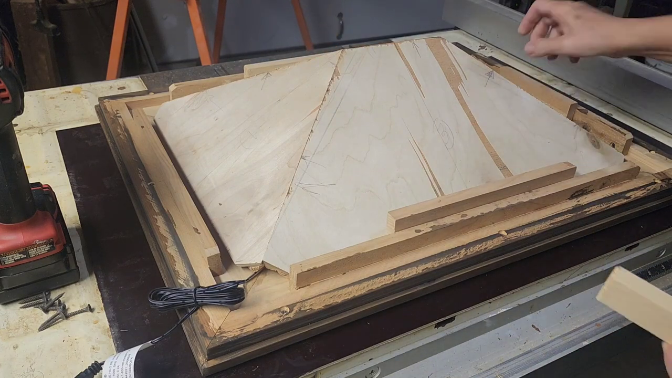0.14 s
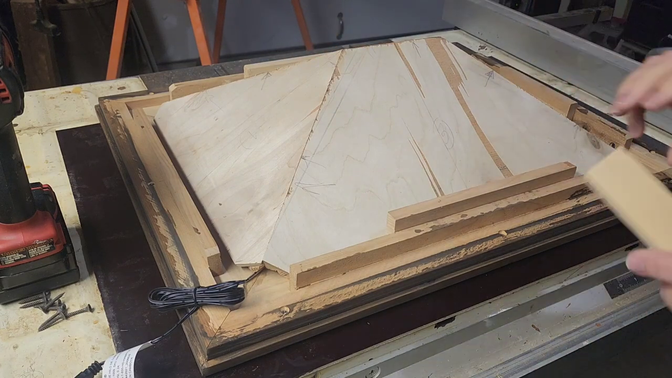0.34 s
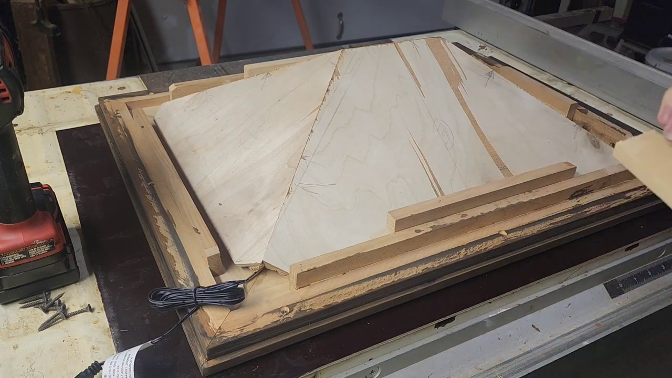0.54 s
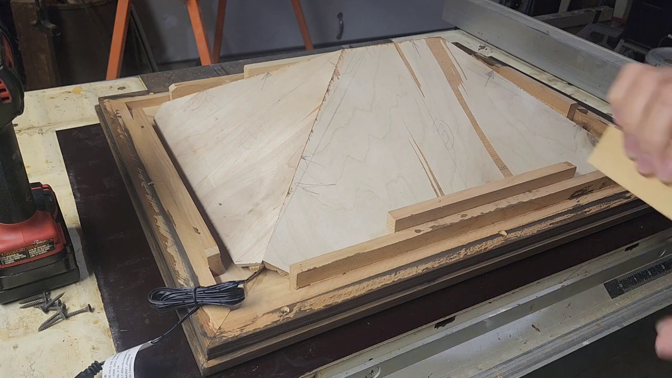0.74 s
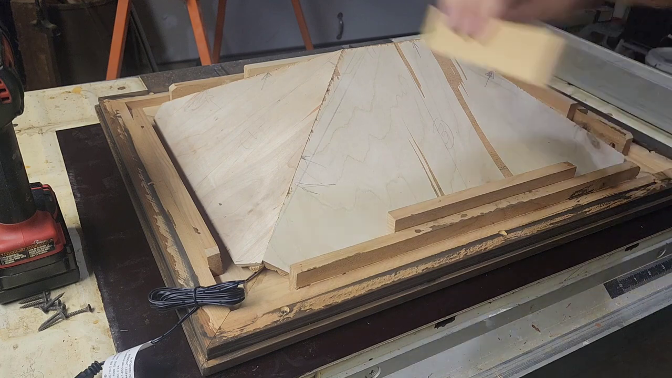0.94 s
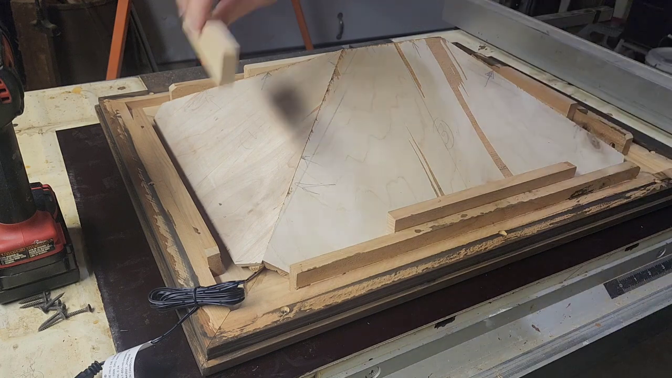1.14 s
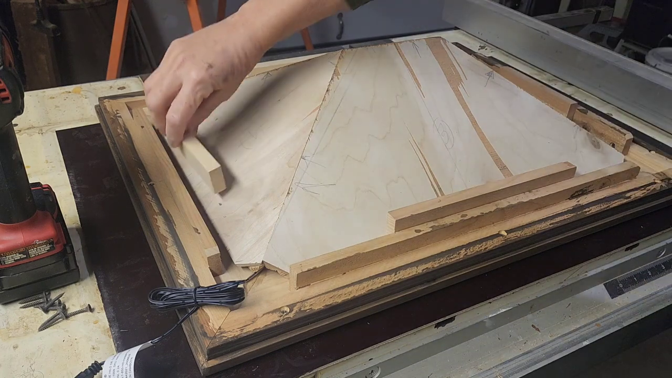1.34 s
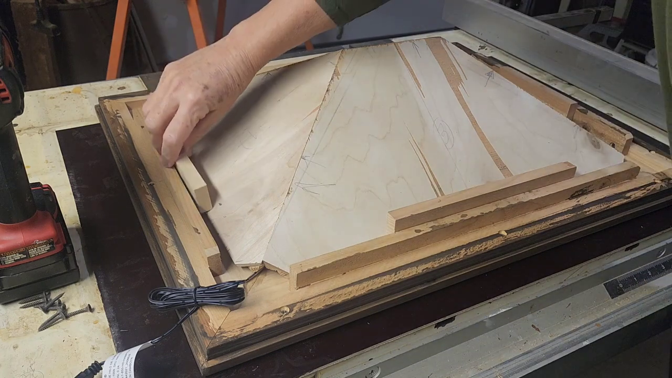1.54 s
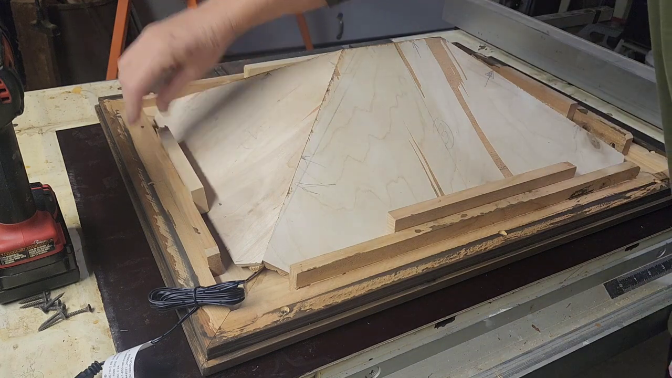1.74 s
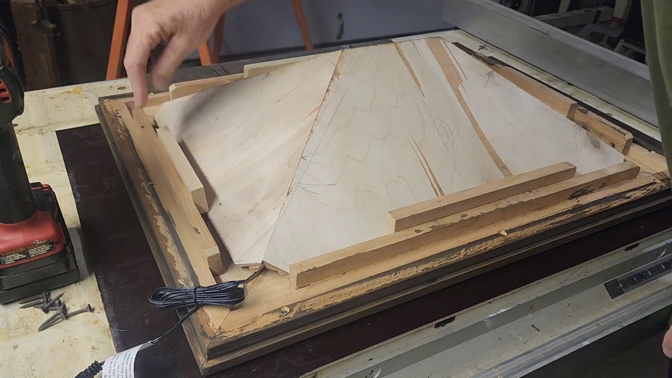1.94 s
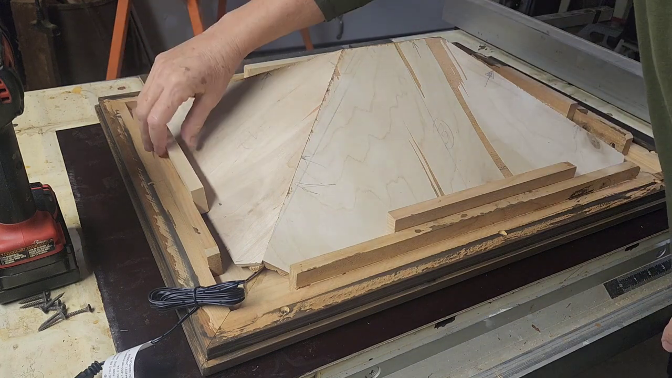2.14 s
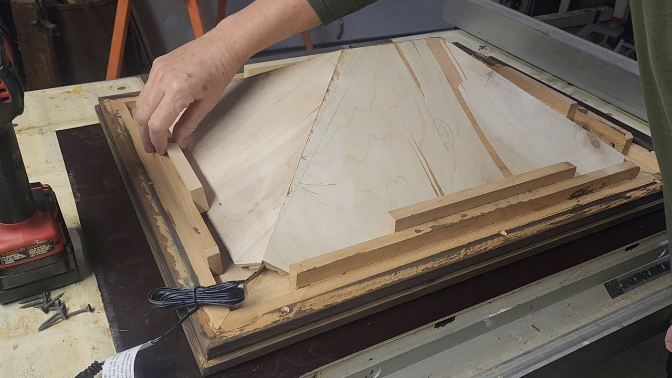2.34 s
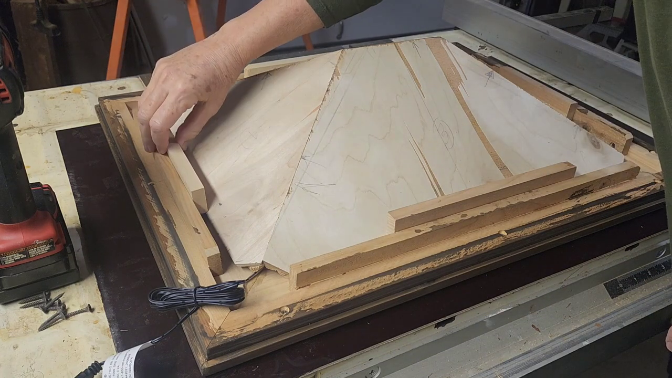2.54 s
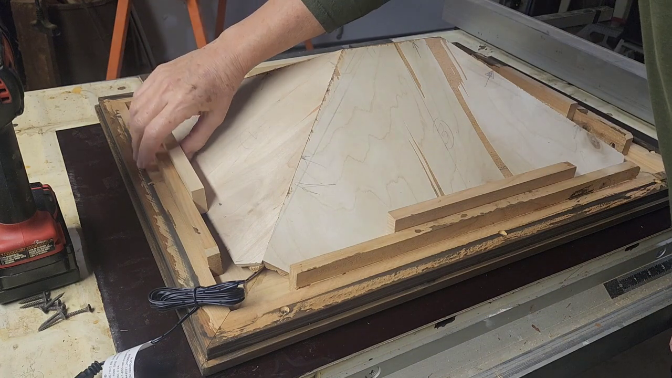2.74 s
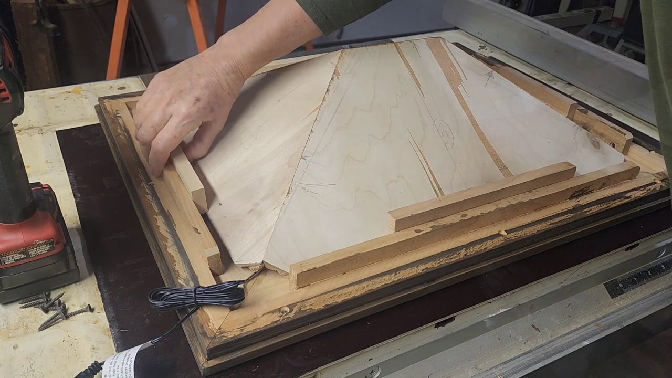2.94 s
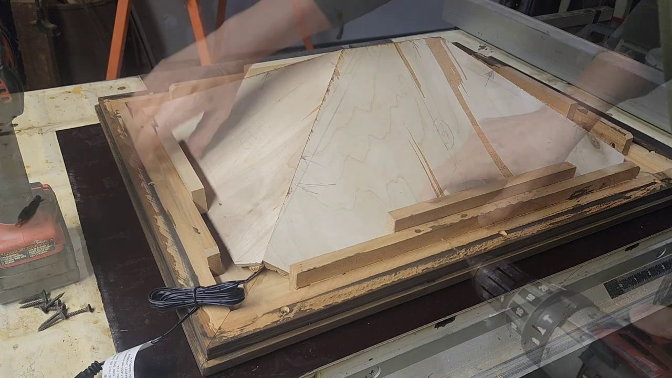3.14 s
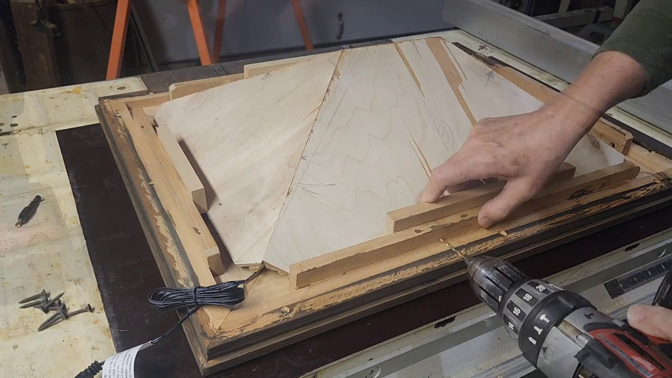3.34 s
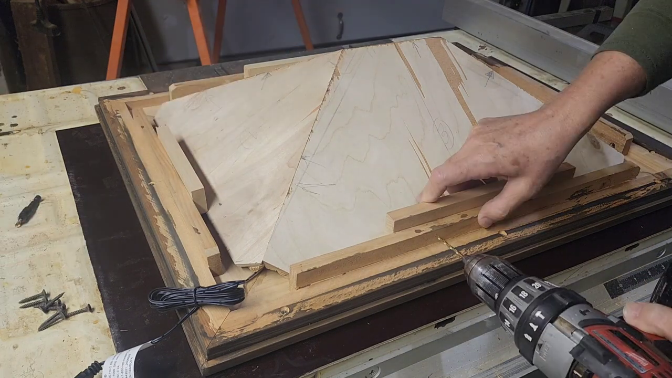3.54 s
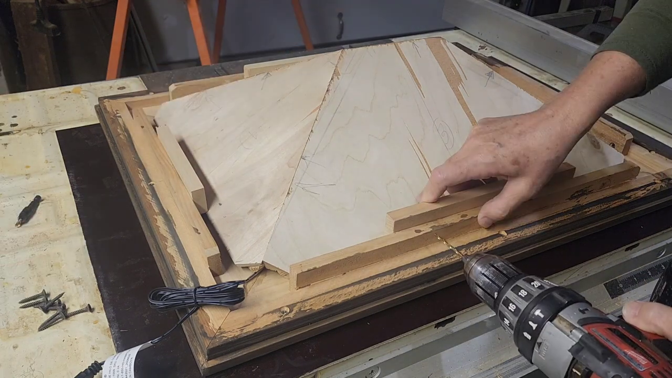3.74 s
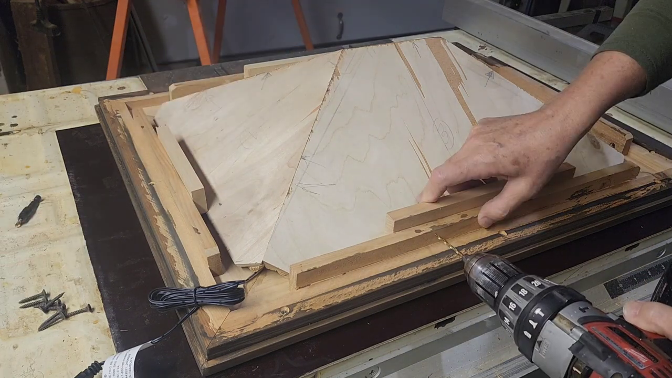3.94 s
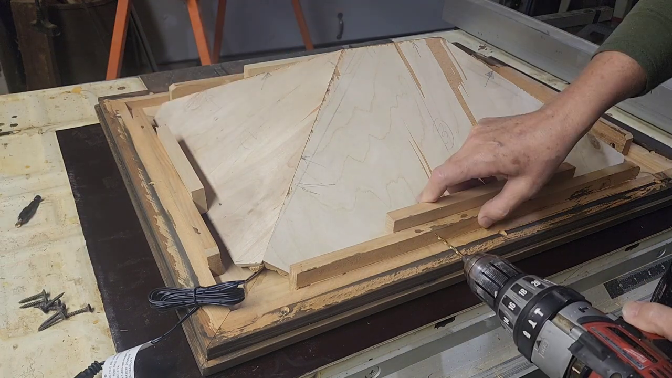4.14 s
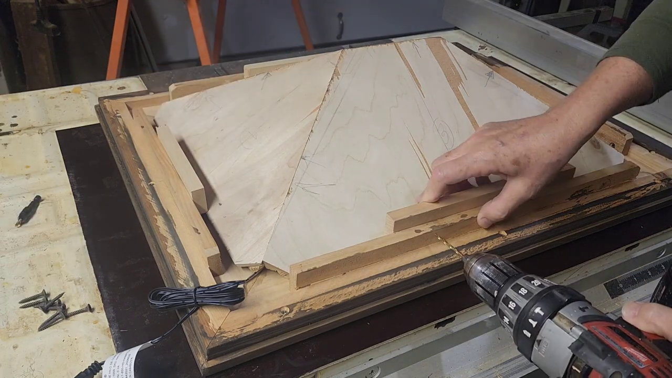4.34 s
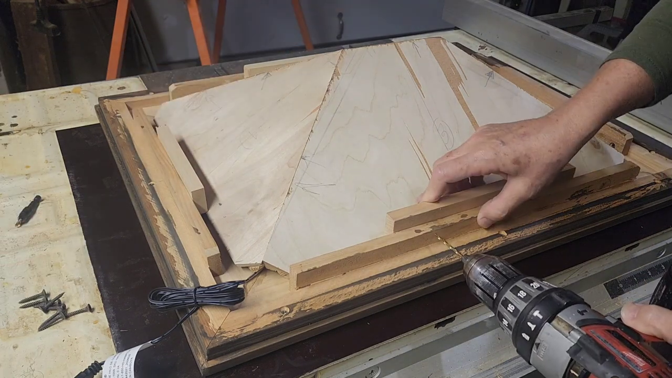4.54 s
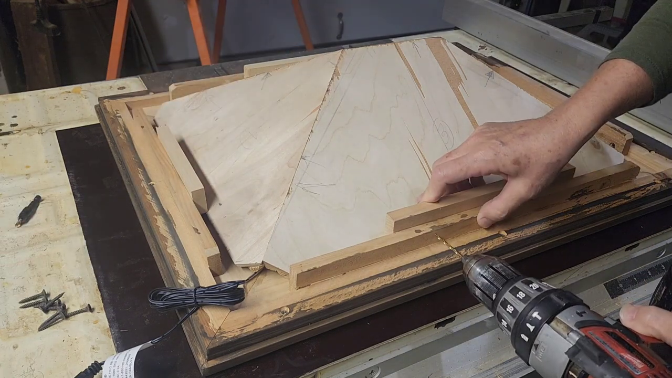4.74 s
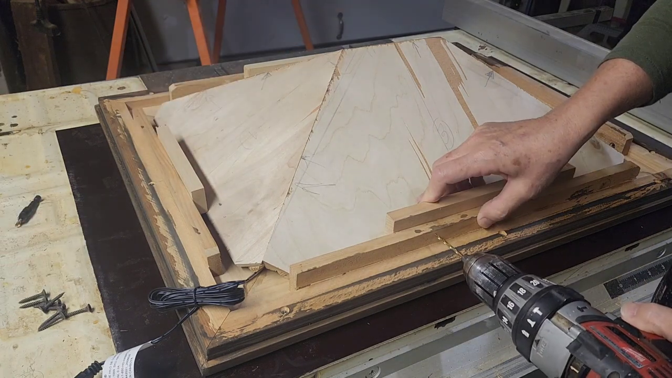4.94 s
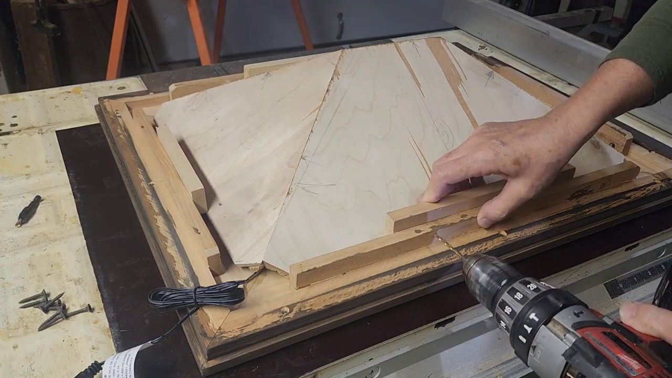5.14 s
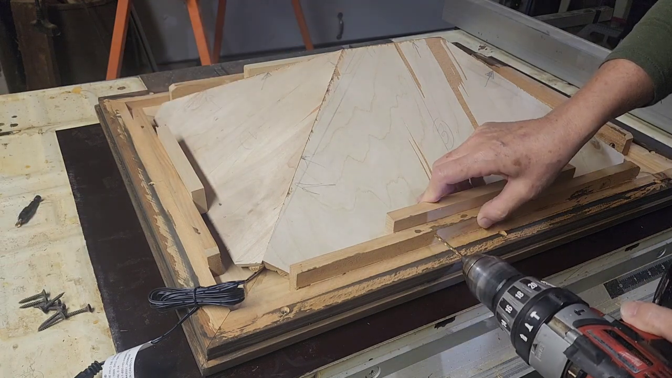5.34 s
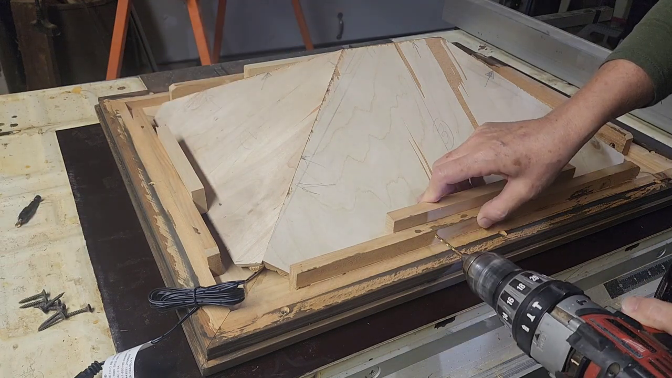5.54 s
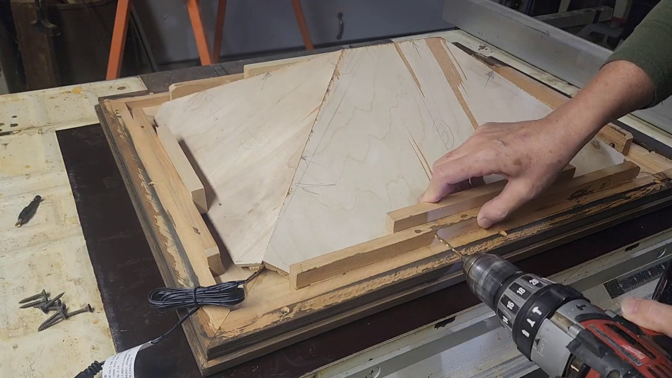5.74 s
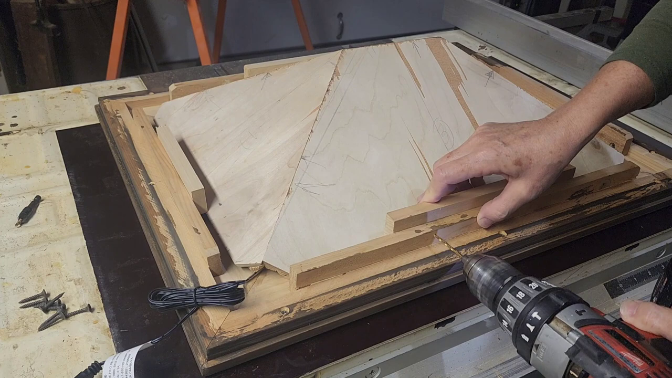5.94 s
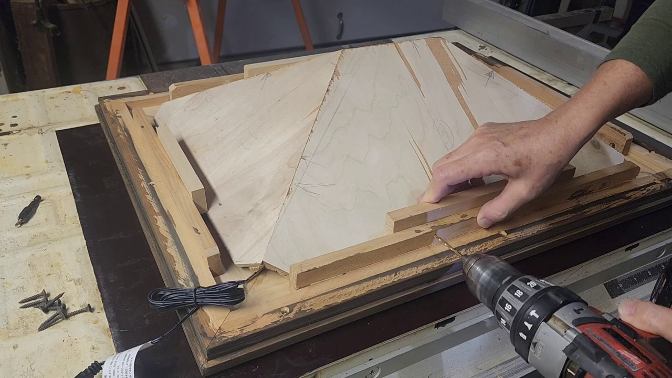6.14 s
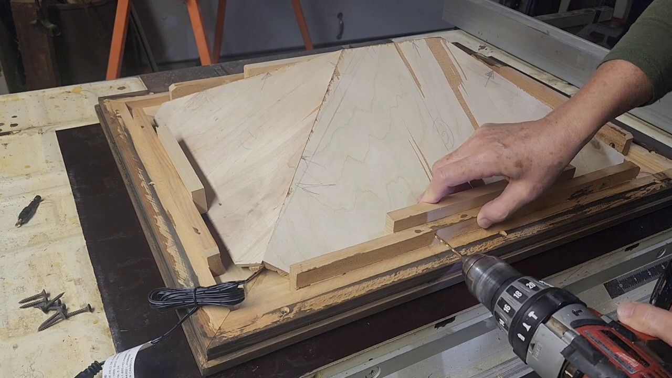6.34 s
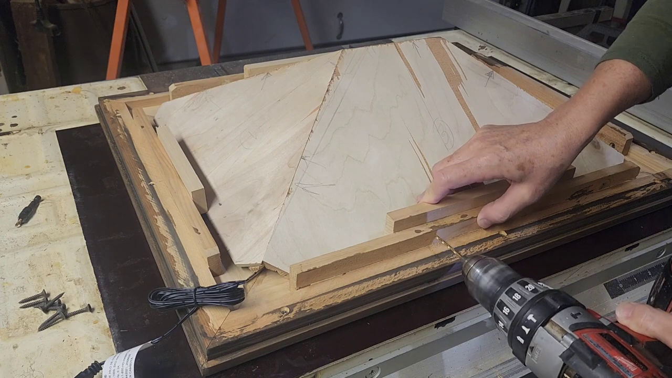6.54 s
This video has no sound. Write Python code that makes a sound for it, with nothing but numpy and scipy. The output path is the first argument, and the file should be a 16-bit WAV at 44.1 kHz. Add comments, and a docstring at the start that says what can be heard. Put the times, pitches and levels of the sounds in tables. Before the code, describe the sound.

Quiet workshop with faint traffic rumble and hum; a wooden batten knocks onto a panel, small metal parts jingle, then a cordless drill whirs up and labours.

```python
"""Cordless drill in a quiet workshop

Traffic rumble, tyre wash and drones rise and fall outside (coloured noise, sines) under a hum and hiss.
A batten knocks on a panel (pushed modes), small metal parts jingle (noise-fed resonators), a grip rubs.
A bit ticks into a screw (filtered cracks); the trigger clicks and the drill spins up, labours, recovers:
slot and gear tones follow the modelled motor speed over tooth rattle, a steady whine and bench shake."""
import sys
import numpy as np
from scipy import signal
from scipy.fft import rfft, irfft
from scipy.io import wavfile
from scipy.ndimage import uniform_filter1d

SR = 44100
rng = np.random.default_rng(int(sys.argv[2]) if len(sys.argv) > 2 else 0)


def to_wav(s):
    """Save 16-bit WAV."""
    ch = np.atleast_2d(s).T  # columns
    pcm = np.round(np.clip(ch, -1, 1) * 32767)  # PCM
    wavfile.write(sys.argv[1], SR, pcm.astype(np.int16))


N = 291060  # samples, 6.6 s
T = np.arange(N) / SR
ROOM_T60_S = 0.28


def undb(db):
    """Level law: amplitude gain from dB."""
    return 10 ** (np.asarray(db) / 20)


def unit(x):
    """Normalisation: scale to an rms of 1."""
    return x / np.sqrt(np.mean(x ** 2))


def noise(channels=1):
    """White noise: equal power at all frequencies, independent in each channel."""
    return rng.standard_normal((channels, N))


def db_at(spectrum, hz):
    """Spectral envelope: dB interpolated along log frequency between (Hz, dB) points."""
    points, db = np.transpose(spectrum)
    return np.interp(np.log(hz), np.log(points), db)


def shape(x, db_of):
    """Zero-phase filtering: weight each Fourier component by a gain in dB."""
    hz = np.arange(1, N // 2 + 2) * SR / N
    return irfft(rfft(x) * undb(db_of(hz)), N)


def colour(x, spectrum):
    """Spectral shaping: filter by (Hz, dB) points, then set the rms to 1."""
    return unit(shape(x, lambda hz: db_at(spectrum, hz)))


def walk(rate, channels=1):
    """Slow random modulation: levels held 1 / rate s and smoothed twice; spread near 1."""
    k = int(SR / rate)
    held = np.repeat(rng.standard_normal((channels, N // k + 1)), k, axis=1)
    smooth = uniform_filter1d(uniform_filter1d(held, k), k)
    return 1.3 * smooth[:, :N]


def curve(rows, silent_db=-130.):
    """Level automation: gain along (s, dB) rows, at silent_db outside them."""
    s, db = np.transpose(rows)
    return undb(np.interp(T, s, db, silent_db, silent_db))


def burst(s, db, held_s, rise_db_per_s, fall_db_per_s):
    """Exponential envelope: attack, hold and release as straight lines in dB."""
    before_s, after_s = np.maximum(s - T, 0), np.maximum(T - s - held_s, 0)
    return undb(db - rise_db_per_s * before_s - fall_db_per_s * after_s)


def pair(x, alike):
    """Interchannel correlation: left and right as sum and difference of a mid and a side signal."""
    alike = np.clip(alike, 0, 1)
    mid = np.sqrt((1 + alike) / 2) * x[0]
    side = np.sqrt((1 - alike) / 2) * x[1]
    return mid + side * np.array([[1], [-1]])


def room(x, wet_db):
    """Diffuse reverberation: convolution with decaying noise, unrelated left and right."""
    t = T[:SR // 2]
    decay = np.exp(-np.log(1000) * t / ROOM_T60_S) * (t > .003)
    tail = rng.standard_normal((2, len(t))) * decay
    tail = tail / np.sqrt(np.sum(tail ** 2, axis=1, keepdims=True))
    return undb(wet_db) * signal.fftconvolve(x[None], tail, axes=1)[:, :N]


def strike(modes, push_ms):
    """Modal impact: a smooth push (Hann pulse) drives decaying modes of alternate sign; peak 1."""
    t = T[:SR // 4]
    ring = np.zeros(len(t))
    for k, (hz, db, t60) in enumerate(modes):
        ring += (-1) ** k * undb(db) * np.sin(2 * np.pi * hz * t) * np.exp(-np.log(1000) * t / t60)
    push = np.hanning(max(int(push_ms * SR / 1000), 1) + 2)
    blow = np.convolve(ring, push)[:len(t)]
    return blow / np.abs(blow).max()


def add(out, x, s):
    """Superposition: mix x into out from s seconds on."""
    i = int(s * SR)
    out[..., i:i + x.shape[-1]] += x[..., :N - i]


# Hiss spectrum. Each row: frequency in Hz, relative density in dB per Hz.
HISS_SPECTRUM = [(1060, -32), (1800, -3), (3050, 0), (3720, -4), (5160, -4.5), (6410, -8), (7400, 3),
                 (8300, -7), (8750, -20), (9500, -9.5), (14000, -11), (15800, -8)]


def hiss():
    """Stationary noise: microphone hiss, unrelated left and right."""
    return undb(-83.0) * colour(noise(channels=2), HISS_SPECTRUM)


# Traffic levels. Each row: time in seconds, deep rumble in dB, rumble in dB, tyre wash in dB.
TRAFFIC_LEVELS = [(0, -57.5, -57.5, -65.5), (.6, -51.5, -55, -68.5), (1.6, -56.5, -54.5, -60.5),
                  (2.1, -61.5, -59, -63), (2.8, -61.5, -58.5, -67.5), (3.6, -67, -63, -74),
                  (4.3, -67.5, -62, -77), (5, -64, -62, -73)]
# Spectra of the three layers. Each row: frequency in Hz, relative density in dB per Hz.
DEEP_SPECTRUM = [(15, -32), (30, -5.5), (50, -2.5), (70, 0), (90, -18.5), (200, -80), (800, -110)]
RUMBLE_SPECTRUM = [(40, -32), (70, -14), (100, 3.5), (140, -4.5), (230, -7.5), (270, -24.5), (350, -18),
                   (500, -26.5), (800, -42.5), (3000, -100)]
WASH_SPECTRUM = [(150, -24), (300, -3.5), (500, -11), (850, -9.5), (1200, -13.5), (1620, -14), (2270, -30),
                 (4000, -43.5), (8000, -41), (16000, -90)]


def traffic():
    """Band-shaped noise through the walls: rumble nearly alike in both ears, tyre wash diffuse."""
    s, *levels = np.transpose(TRAFFIC_LEVELS)
    spectra, likeness = (DEEP_SPECTRUM, RUMBLE_SPECTRUM, WASH_SPECTRUM), (.99, .96, .05)
    out = np.zeros((2, N))
    for db, spectrum, alike in zip(levels, spectra, likeness):
        gain = undb(np.interp(T, s, db) + 1.17 * walk(12))
        out = out + gain * pair(colour(noise(channels=2), spectrum), alike)
    return out


# Low drones. Each row: mean frequency in Hz, start in seconds, end in seconds, mean crest level in dB.
DRONE_ROWS = [(57.4, 0.11, 1.1, -49.5), (104.6, 1.2, 1.62, -54), (93.6, 3.53, 4.25, -57),
              (56, 5.1, 7.4, -60)]


def drones():
    """Frequency-modulated sines: low tones swell and fade while pitch and level wander."""
    out = np.zeros((1, N))
    for hz, start, end, db in DRONE_ROWS:
        progress = np.clip((T - start) / (end - start), 0, 1)
        swell = np.sqrt(np.clip(np.sin(np.pi * progress), 0, 1))
        tone = np.sin(2 * np.pi * hz * np.cumsum(1 + .02 * walk(5)[0]) / SR)
        out = out + swell * undb(db + 1.8 * walk(10)) * tone
    return out


HUM_HZ, HUM_DB = 402.6, -66.5  # mean pitch; mean rms level of the two channels


def machine_hum():
    """Near-periodic source: one sine with slight drift, 2.4 dB stronger on the right."""
    hum = np.sin(2 * np.pi * HUM_HZ * np.cumsum(1 + 0.00203 * walk(3.98)[0]) / SR)
    pan_db = np.array([[-1.2], [1.2]])
    return np.sqrt(2) * undb(HUM_DB + 2.0 * walk(5.93) + pan_db) * hum


# Batten on panel. Each row: time in seconds, peak of the modal blow in dB, contact in ms,
# extra level of the panel modes below 400 Hz in dB.
BATTEN_KNOCKS = [(.017, -47, 4.3, -9), (1.22, -54, 3.8, 7), (1.322, -50, 3.8, 1), (1.509, -38, 2, 1),
                 (1.602, -30.5, 0.24, -11), (1.659, -33.5, 1.3, 5), (2.657, -49, 2.7, 6),
                 (2.866, -51.5, 3.1, 1), (3.507, -59.5, 0.68, -13)]
# Panel modes. Each row: frequency in Hz, relative level in dB, decay time T60 in seconds.
PANEL_MODES = [(209.3, -0.5, 0.086), (277, 0.5, 0.04), (481, 0, 0.015), (681, -5, 0.043),
               (816, -2.5, 0.068), (1110, -4, 0.015), (1450, -8.5, 0.028), (2000, -8.5, 0.01),
               (2360, -18, 0.038)]


def knocks():
    """Contact-time filtering: wood on wood, duller the longer the contact; flat blows boom the panel."""
    out, t = np.zeros(N), T[:SR // 4]
    clack_band = signal.butter(2, [450, 2300], "bandpass", fs=SR, output="sos")
    for s, db, push_ms, boom_db in BATTEN_KNOCKS:
        modes = [(hz, g + boom_db * (hz < 400), t60) for hz, g, t60 in PANEL_MODES]
        # the many small modes of the batten blur into a short clack
        grains = rng.standard_normal(len(t)) * np.exp(-t / 0.0074)
        clack = signal.sosfilt(clack_band, grains) * 0.37 / (1 + 2.5 * push_ms)
        add(out, undb(db) * (strike(modes, push_ms) + clack), s)
    return out + room(out, -6)


# Bursts of jingling. Each row: start of hold in seconds, relative drive in dB, hold in seconds,
# level of the part between 4000 and 5500 Hz in dB against an even balance at -6.
JINGLE_BURSTS = [(0, -65, 0.011, -14), (.165, -72, .02, -6), (.245, -67, 0.018, -19), (.35, -82, 0.083, 3),
                 (.52, -72, 0.011, 4), (.55, -80.5, 0.033, 4), (0.654, -61, 0.0086, -13),
                 (1.546, -72, .03, -6), (1.6, -74, 0.0018, -2), (1.674, -74, .005, -6),
                 (2.664, -76, .005, -3), (2.745, -80, .01, -15), (2.87, -80, 0.0092, -10)]
# Ringing modes of the parts. Each row: frequency in Hz, bandwidth in Hz, relative level in dB.
METAL_PARTS = [(2440, 60, -10), (4770, 54, -5.5), (6240, 130, -2), (6830, 110, -11), (9250, 60, -12),
               (10100, 200, -19), (11600, 60, -32)]
JINGLE_RISE_DB_PER_S, JINGLE_FALL_DB_PER_S = 500, 357


def jingle():
    """Resonator excitation: dense tiny collisions keep narrow modes ringing over a dry rustle."""
    bursts = np.array([burst(s, db, held_s, JINGLE_RISE_DB_PER_S, JINGLE_FALL_DB_PER_S)
                       for s, db, held_s, _ in JINGLE_BURSTS])
    shaking = bursts.sum(axis=0)
    low_db = np.array(JINGLE_BURSTS)[bursts.argmax(axis=0), -1]  # from the loudest burst of the moment
    shaken = shaking * noise(channels=2) * undb(2.6 * walk(140))
    rustle = colour(noise(channels=2), [(1500, -34), (3000, -5), (6500, -6.0), (8700, -8),
                                        (10000, -20), (15800, -11)])
    out = undb(-5.5) * rustle * np.abs(shaken)
    for hz, width, db in METAL_PARTS:
        b, a = signal.iirpeak(hz, hz / width, SR)
        share_db = (low_db + 6) * (4000 < hz < 5500)
        gain = undb(db + share_db + 18.5 + 3.3 * walk(29.83))  # each part flickers on its own
        out = out + gain * signal.lfilter(b, a, shaken)
    return out


# Rubbing hand. Each row: start of hold in seconds, level in dB, hold in seconds.
HAND_RUBS = [(4.27, -78, .02), (4.297, -55, .025), (4.435, -74, .005)]
# Spectrum of the rub. Each row: frequency in Hz, relative density in dB per Hz.
RUB_SPECTRUM = [(400, -5), (750, 12), (1050, -10), (1500, 12), (1910, -5), (2340, 11.5), (3300, 1),
                (4700, 5.5), (6200, -2), (7400, 4.5), (9000, -8), (15800, -11)]
RUB_RISE_DB_PER_S, RUB_FALL_DB_PER_S = 1800, 212


def rub():
    """Friction noise: a grainy scrape as the grip shifts."""
    grains = noise(channels=2) * undb(1.8 * walk(300))
    scrape = pair(colour(grains, RUB_SPECTRUM), 0.21)
    return sum(burst(*row, RUB_RISE_DB_PER_S, RUB_FALL_DB_PER_S) for row in HAND_RUBS) * scrape


# Bit and trigger ticks. Each row: time in seconds, peak of the crack in dB, centre in Hz,
# steel ring against the crack in dB, left minus right in dB.
BIT_TICKS = [(2.295, -68, 6500, -20, 4), (4.433, -62, 2170, 2, 4), (4.658, -59, 1370, -3, -1.5),
             (4.769, -56.5, 1510, -1, 1), (4.921, -50.5, 1240, -37, -5), (5.06, -51.5, 4450, -24, -6),
             (5.062, -47, 2000, -21, 5)]
# Steel modes. Each row: frequency in Hz, relative level in dB, decay time T60 in seconds.
STEEL_MODES = [(4700, 0, 0.012), (2300, -11, 0.012), (7500, -11, 0.01)]


def ticks():
    """Transient resonance: a short broad crack around each centre and a little ring of steel."""
    out, t = np.zeros((2, N)), T[:SR // 4]
    for s, db, centre_hz, ring_db, pan_db in BIT_TICKS:
        b, a = signal.iirpeak(centre_hz, 2.3, SR)
        grains = rng.standard_normal(len(t)) * np.exp(-t / 0.0057)
        crack = signal.lfilter(b, a, signal.lfilter(b, a, grains))
        tick = crack / np.abs(crack).max() + undb(ring_db) * strike(STEEL_MODES, .05)
        add(out, undb(db + np.array([[pan_db], [-pan_db]]) / 2) * tick, s)
    return out + room(out.mean(axis=0), -9)


# motor speed as rotor slot rate: a ramp rounded off at free speed, a sag as the screw bites, a recovery
SLOTS = 5  # per shaft turn
START_S, RAMP_HZ_PER_S, KNEE_HZ, FREE_HZ = 5.102, 5900, 105, 1030
BITE_S, BITE_SOFT_S, SAG_HZ, SAG_S = 5.4025, .0105, 253.1, .1947
EASE_S, EASE_WIDTH_S, DRAG_HZ, CREEP_HZ_PER_S = 6.1315, .0291, 76.3, 44.4


def soft(x, width):
    """Soft threshold: zero below 0 and x above, rounded over the width."""
    return width * np.logaddexp(0, x / width)


def motor():
    """Torque-speed balance: slot rate in Hz, share of the load (0-1), how far it has eased (0-1)."""
    eased = (1 + np.tanh((T - EASE_S) / EASE_WIDTH_S / 2)) / 2
    load = (1 - np.exp(-soft(T - BITE_S, BITE_SOFT_S) / SAG_S)) * (1 - eased)
    drag_hz = DRAG_HZ - CREEP_HZ_PER_S * (T - EASE_S)
    top_hz = FREE_HZ - SAG_HZ * load - eased * drag_hz
    ramp_hz = RAMP_HZ_PER_S * np.maximum(T - START_S, 0)
    return top_hz - soft(top_hz - ramp_hz, KNEE_HZ), load, eased


def bench_shake(sing, turns):
    """Rotor unbalance: a sine at the shaft rate and low noise shake the bench unevenly."""
    bench = colour(noise()[0], [(60, -15.5), (110, -21), (170, -16.5), (215, -5.0), (260, -21),
                                (400, -17), (1500, -61)])
    unbalance = undb(-32.5 + 3.8 * walk(13)[0]) * np.sin(2 * np.pi * turns)
    return sing * (unbalance + undb(-32.0 + 1.8 * walk(11)[0]) * bench)


# Whine level. Each row: time in seconds, relative level in dB.
WHINE_LEVELS = [(5.07, -73), (5.085, -48), (5.1, -41), (5.13, -35), (5.2, -47), (5.3, -65.5), (6.6, -63)]
WHINE_HZ = 7620


def switch_whine():
    """Harmonic tone: the speed switch whines at a fixed pitch with a weak octave."""
    octave = 0.17 * np.sin(4 * np.pi * WHINE_HZ * T)
    return curve(WHINE_LEVELS) * (np.sin(2 * np.pi * WHINE_HZ * T) + octave)


# Spectrum of the drill noise: dark below about 3 kHz, brighter above, with a peak near 7.4 kHz.
# Each row: frequency in Hz, relative density in dB per Hz.
DRILL_COLOUR = [(300, -38), (900, -20), (1400, -12.5), (2300, -13.5), (3100, -14.5), (3400, -6.5),
                (4300, -5.5), (5500, -3), (6800, -5), (7400, 3), (7900, -3), (9500, -14.5), (12000, -18),
                (15800, -9)]


def gear_rattle(loud, turns):
    """Cyclic impact noise: teeth strike unevenly, partly repeating on every shaft turn."""
    pattern = np.diff(rng.standard_normal(257))[(turns % 1 * 256).astype(int)]
    teeth = noise()[0] * undb(2.2 * walk(1500)[0]) + .35 * pattern
    throb = 1 + 0.24 * np.sin(2 * np.pi * turns * .11) + 0.058 * np.sin(2 * np.pi * turns * 0.68)
    return loud * throb * undb(1.2 * walk(45)[0]) * colour(teeth, DRILL_COLOUR)


# Turns of phase by which nearby surfaces shift the 2nd to 6th slot tone on the left.
MAIN_PHASE_LEAD = [0.4, 0.67, 0.82, 0.095, 0.086]
# Further tones: multiples of the slot rate, and their relative levels in dB against the drill colour, before
# all are raised by 4 dB.
FURTHER_SLOT_ORDERS = [1, 7, 8, 9, 10, 11, 13, 14]
FURTHER_SLOT_DB = [-22, -10, -13, -15, -14, -15, -15, -17]
# Gear mesh: multiples of the shaft rate, and their relative levels in dB against the drill colour, before all
# are raised by 4 dB.
GEAR_ORDERS = [20.5, 22.5, 26, 27.3, 32, 33.75, 36, 37, 46]
GEAR_DB = [-11, -12, -16, -15, -15, -14, -16, -17, -19]


def singing(shaft_hz, turns, main_db):
    """Order tones: sines locked to the shaft, each wavering on its own in each channel."""
    waver = .6 * walk(14, channels=2) + .9 * walk(70, channels=2)
    size = len(turns)

    def tone(order, waver_db, left_lead):
        """Phase locking: a sine at a multiple of the shaft rate, with its own stretch of waver."""
        start = rng.integers(N - size)
        phase = order * turns + rng.random() + np.array([[left_lead], [0]])
        return undb(waver_db * waver[:, start:start + size]) * np.sin(2 * np.pi * phase)

    out = np.zeros((2, size))
    for k, (db, lead) in enumerate(zip(main_db, MAIN_PHASE_LEAD), start=2):
        out = out + undb(db + 2.0) * tone(SLOTS * k, 3.5, lead)
    orders = [SLOTS * k for k in FURTHER_SLOT_ORDERS] + GEAR_ORDERS
    for order, db in zip(orders, FURTHER_SLOT_DB + GEAR_DB):
        colour_db = db_at(DRILL_COLOUR, order * shaft_hz)
        out = out + undb(db + 4.0 + colour_db) * tone(order, 3.0, 0)
    return out


# 2nd to 6th slot tone. Each row: relative level at top speed in dB, under load in dB, once eased in dB,
# slot rate from which it sings fully in Hz.
MAIN_SLOT_TONES = [(-14, -12, -14, 520), (-12, -10, -9, 930), (-11.5, -12, -17, 900), (-14, -15, -12, 900),
                   (-10, -11, -16, 930)]
# Direction of the drill. Each row: frequency in Hz, left minus right in dB.
SIDE_SHADE = [(200, 0), (380, -9), (700, 2), (1290, -6), (2380, 0.5), (4400, -5), (8120, -1.5), (15000, 1)]
# gear and fan noise: engaging at the start, then growing with speed
ENGAGE_S, ENGAGE_DB_PER_S, SLOW_DB, FULL_DB, SPEED_POWER = 5.111, 1400, -33, -21.5, 1.2
SPIN_UP_DB_PER_OCTAVE = 40  # how fast a tone emerges while the motor spins up
TONES_BREAK_DB = 2.2  # spread of the random level of each main tone


def drill():
    """Rotating machinery: slots and gears sing over rattle; heard right of the microphones."""
    slot_hz, load, eased = motor()
    slot_hz = np.maximum(slot_hz, 20)
    shaft_hz = slot_hz / SLOTS
    turns = np.cumsum(shaft_hz * (1 + .0008 * walk(40)[0])) / SR
    on = T > WHINE_LEVELS[0][0]

    growth = np.hypot(undb(SLOW_DB), undb(FULL_DB) * (slot_hz / FREE_HZ) ** SPEED_POWER)
    loud = burst(ENGAGE_S, 0, N, ENGAGE_DB_PER_S, 0) * growth
    sing = loud * (shaft_hz / 190) ** 0.23  # tones rise out of the rattle with speed

    reached_hz = np.maximum.accumulate(slot_hz)
    tone_db = []
    for top, loaded, free, from_hz in MAIN_SLOT_TONES:
        level_db = top + (loaded - top) * load + (free - top) * eased
        emerging_db = SPIN_UP_DB_PER_OCTAVE * np.log2(np.minimum(reached_hz / from_hz, 1))
        tone_db.append(level_db + TONES_BREAK_DB * walk(18)[0] + emerging_db)
    tones = np.zeros((2, N))
    tones[:, on] = singing(shaft_hz[on], turns[on], [db[on] for db in tone_db])

    rattle = gear_rattle(loud, turns)
    direct = undb(-2.0) * (rattle + switch_whine()) + sing * tones
    heard = np.array([np.roll(direct[0], 7), direct[1]])  # left hears it 7 samples late
    heard = heard + room(rattle, 0.75)
    shaded = shape(heard, lambda hz: db_at(SIDE_SHADE, hz) * np.array([[.5], [-.5]]))
    return on * shaded + bench_shake(sing, turns)


def scene():
    """Superposition: background, handling sounds and drill add linearly."""
    background = hiss() + traffic() + drones() + machine_hum()
    handling = knocks() + jingle() + rub() + ticks()
    return background + handling + drill()


TOP_HZ = 15760


def record(dry):
    """Band limiting: a steep elliptic low-pass in the recorder cuts the top."""
    return signal.sosfilt(signal.ellip(14, .3, 80, TOP_HZ, fs=SR, output="sos"), dry)


dry = scene()
out = record(dry)
to_wav(out)
```